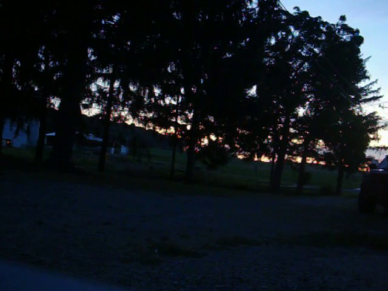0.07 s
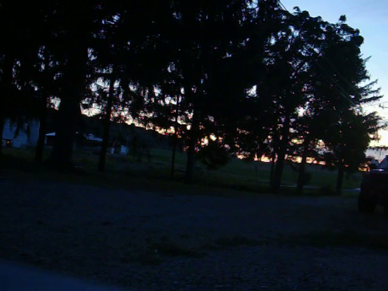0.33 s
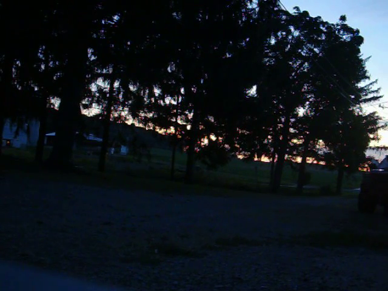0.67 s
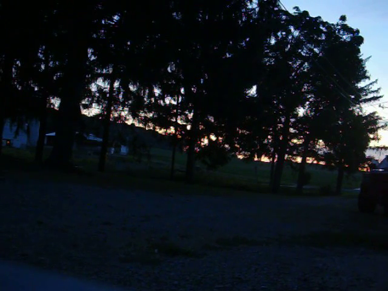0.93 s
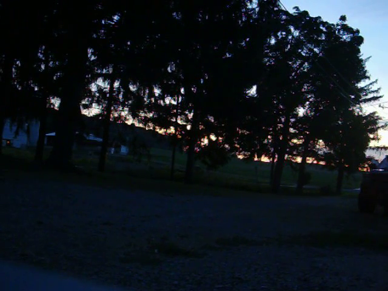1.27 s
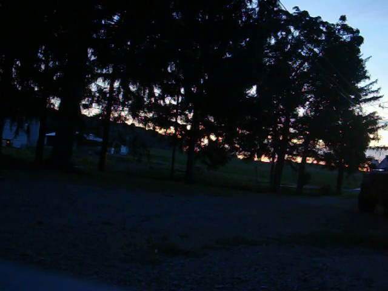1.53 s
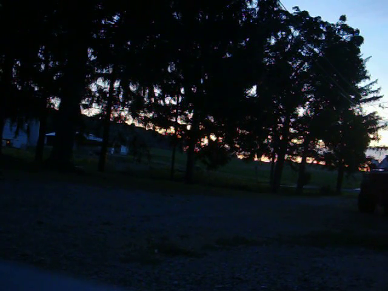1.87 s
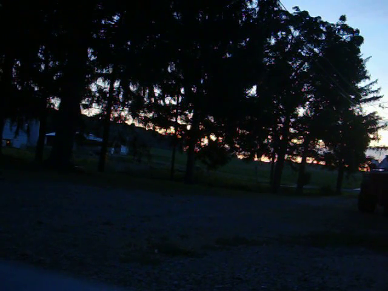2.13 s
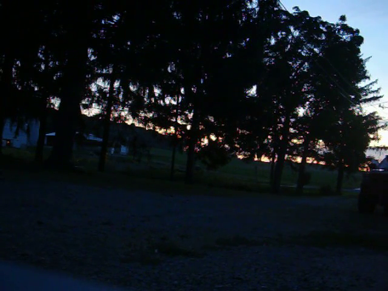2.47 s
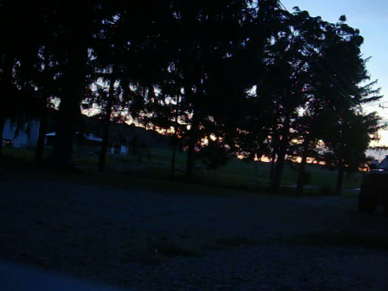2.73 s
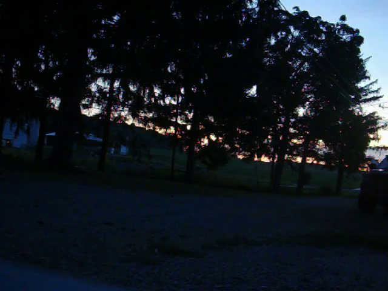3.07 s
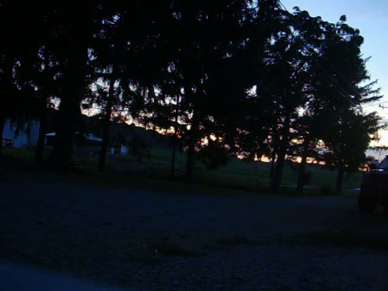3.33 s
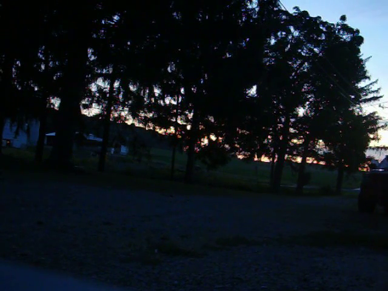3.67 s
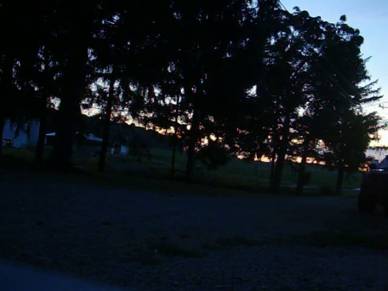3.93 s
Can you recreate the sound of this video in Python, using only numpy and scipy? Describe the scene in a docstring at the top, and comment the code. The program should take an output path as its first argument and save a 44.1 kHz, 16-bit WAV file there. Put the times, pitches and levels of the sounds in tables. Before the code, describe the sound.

Small frogs peep far off throughout the four seconds, their short rising whistles blurring into a high hiss, with one faint cricket chirping evenly. Beneath them lie soft air noise, a deep rumble, a motor's hum and a faint electrical buzz. At about 3 seconds a door rattles and bumps loudly shut, its latch clicking, then settles with a softer thud around 3.5 seconds, echoing briefly in the yard.

```python
"""A chorus of small frogs peeps far off in a yard at dusk, with one faint cricket.
Each peep is a short rising whistle; the farthest frogs blur into a hiss. Under them lie soft air
noise, a deep rumble, the hum of a motor and a faint mains buzz. Near the end something like a door
rattles and bumps shut, then settles with a softer thud. Each bump thuds, rings the door's panel
and clicks its latch, and the yard echoes."""
import sys
import numpy as np
from scipy import signal
from scipy.fft import rfft, irfft
from scipy.io import wavfile
from scipy.ndimage import uniform_filter1d

SR = 44100
rng = np.random.default_rng(int(sys.argv[2]) if len(sys.argv) > 2 else 0)


def to_wav(s):
    """Save 16-bit WAV."""
    ch = np.atleast_2d(s).T  # columns
    pcm = np.round(np.clip(ch, -1, 1) * 32767)  # PCM
    wavfile.write(sys.argv[1], SR, pcm.astype(np.int16))


N = 176400  # 4 s

# A "colour" says how strong the low and high parts of a sound are, compared with each other.
# colour of the air noise (f/Hz, level/dB)
AIR_COLOUR = [(12, 2), (30, -1), (55, -0.5), (75, -2.5), (120, -5.5), (190, -4.5), (400, -5.5), (600, -11),
              (900, -16.5), (1100, -17), (1750, -21.5), (3900, -24), (5300, -25), (6100, -31), (6900, -64)]
# colour of the deep rumble (f/Hz, level/dB)
RUMBLE_COLOUR = [(20, -34), (44, -10.5), (57, 5), (70, -13), (130, -35.5), (400, -70)]
# how the rumble rises and falls (t/s, level/dB)
RUMBLE_LEVEL = [(0, -39), (.3, -35.5), (.55, -34), (.7, -37), (1.05, -43.5), (1.5, -48), (3, -41.5),
                (4, -34)]
# tones of the motor (multiple of MOTOR_HZ, level/dB)
MOTOR_TONES = [(1, -39.5), (1.5, -46), (2, -41), (3, -47.5), (9, -51.5), (10, -56)]
# tones of the mains buzz (multiple of MAINS_HZ, level/dB)
MAINS_TONES = [(2, -45), (7, -49.5), (12, -57), (13, -54), (14, -55), (16, -51), (21, -64.5), (61, -53),
               (62, -57)]
# time the yard's echo takes to fade by 60 dB (f/Hz, t/s)
ECHO_FADE = [(100, .7), (500, 0.6), (1300, 0.67), (3000, 0.38), (6500, 0.34)]
# colour of the farthest frogs, with their octave (f/Hz, level/dB)
FAR_FROG_COLOUR = [(1700, -30.5), (2030, -9), (2180, 0.5), (2550, 3.5), (2680, -2.5), (3050, -0.5),
                   (3370, 4), (3520, -7), (3850, -23.5), (4450, -14), (4750, -11.5), (5030, -15),
                   (5400, -16), (6500, -47.5)]
# nearer frog groups (pitch f/Hz, spread f/Hz, level/dB, peeps per second, peep length t/s)
FROG_GROUPS = [(2204, 41, -48, 30, .11), (2502, 46, -51, 31, 0.1), (2772, 90, -50, 46, .1),
               (3304, 14.6, -45.5, 13, 0.036), (3267, 54, -47.5, 40, .1)]
# how one more frog group swells and fades (t/s, level/dB)
SWELL_LEVEL = [(0, -39), (.7, -55.5), (1.4, -49), (1.95, -46), (2.25, -38.5), (2.9, -39.5), (3.25, -45),
               (3.6, -56.5), (4, -41)]
# strength of the overtone an octave above a peep (peep pitch f/Hz, level/dB)
PEEP_OCTAVE = [(2200, -10.5), (2520, -18), (2900, -26), (3300, -41.5)]
# bumps of the door (start t/s, fade t/s, thud level/dB, panel level/dB, latch level/dB)
DOOR_BUMPS = [(2.986, 0.077, -31.5, -35, -35), (3.02, .02, -27.5, -28.5, -38),
              (3.025, 0.014, -20, -35, -19), (3.04, 0.074, -23, -39.5, -43.5),
              (3.07, 0.0088, -27, -30.5, -48), (3.081, 0.0092, -20.5, -15.5, -20),
              (3.101, 0.024, -18.5, -22.5, -24), (3.123, 0.0049, -13.5, -24, -43),
              (3.134, 0.0066, -20, -13.5, -18.5), (3.139, 0.029, -39.5, -20.5, -21),
              (3.181, 0.06, -27, -35.5, -29.5), (3.434, 0.015, -23, -35, -28.5),
              (3.459, 0.016, -21.5, -30, -51), (3.477, 0.018, -25, -41.5, -25.5),
              (3.539, .025, -34, -50.5, -40)]
# tones the door panel rings at (f/Hz, level/dB, time to fade by 60 dB t/s)
PANEL_TONES = [(202, -4, .14), (363, -4, 0.019), (445, -7, 0.043), (632, 4, 0.041), (818, 4.5, 0.03),
               (960, -17, 0.012), (1207, -2, 0.11), (1355, 1.5, 0.03), (1540, -0.5, .02),
               (1970, -3.5, .022), (2080, -3, .03), (2460, -5.5, .032), (2700, -4, 0.038),
               (3350, -28, 0.017)]
# colour of the door's thud (f/Hz, level/dB)
THUD_COLOUR = [(25, -17), (70, -16), (115, -0.5), (160, -4.5), (215, 2), (285, -7.5), (400, -3.5),
               (620, -5), (1000, -19.5), (3000, -51.5)]
# colour of the latch's click (f/Hz, level/dB)
LATCH_COLOUR = [(150, -7), (700, 16.5), (1400, 4.5), (2600, 5.5), (3600, 2.5), (4600, -0.5), (5800, -6.5),
                (6700, -20.5), (7600, -53)]

MOTOR_HZ, MAINS_HZ = 53.8, 60


def amp(db):
    """Turns decibels into a number to multiply by."""
    return 10 ** (np.asarray(db) / 20)


def unit(x):
    """Scales a sound to an average strength (rms) of 1."""
    return x / np.sqrt(np.mean(x ** 2) + 1e-20)


def read(points, hz):
    """Looks up a frequency in a table, blending between rows on a log scale."""
    f, value = np.transpose(points)
    return np.interp(np.log(hz + 1), np.log(f + 1), value)


def level(points):
    """Makes a volume curve from (t/s, level/dB) points."""
    return amp(np.interp(np.arange(N) / SR, *np.transpose(points)))


def add(mix, start_s, sound):
    """Adds a sound to the mix at a given time."""
    part = mix[max(round(start_s * SR), 0):][:len(sound)]
    part += sound[:len(part)]


def drift(rate_hz):
    """A smooth random wobble of strength 1; a higher rate wobbles faster."""
    smoothing = np.exp(-(np.fft.rfftfreq(N, 1 / SR) / rate_hz) ** 2)
    return unit(irfft(rfft(rng.standard_normal(N)) * smoothing, N))


def wash(colour, patch_db=0.78, flicker_db=0.2):
    """Coloured noise with drifting louder patches and a slight overall flicker."""
    frames, hz = N // 512 + 6, np.fft.rfftfreq(2048, 1 / SR)
    real, imag, patches = rng.standard_normal((frames, len(hz), 3)).T
    patches = unit(uniform_filter1d(uniform_filter1d(patches, size=12, axis=0), size=6, axis=1))
    spectrum = (real + 1j * imag) * amp(read(colour, hz)[:, None] + patch_db * patches)
    noise = signal.istft(spectrum, nperseg=2048, noverlap=1536)[1][:N]
    return unit(noise * amp(flicker_db * drift(25)))


def air(hiss_db=-35.5):
    """Steady air noise over a distant rumble that rises and falls."""
    return amp(hiss_db) * wash(AIR_COLOUR) + level(RUMBLE_LEVEL) * wash(RUMBLE_COLOUR)


def hum(hz, tones, waver_db, wander_rad):
    """A motor or mains hum: multiples of one pitch, each wavering on its way through the air."""
    turns, out = hz * np.arange(N) / SR, np.zeros(N)
    for multiple, db in tones:
        waver = amp(waver_db * drift(11))
        phase = 2 * np.pi * (multiple * turns + rng.random()) + wander_rad * drift(10)
        out += amp(db) * unit(waver * np.sin(phase))
    return out


def yard_echo(sound, build_s=0.018):
    """Walls and trees scatter a sound into a soft echo; the high notes die first."""
    hz, t, spectrum = signal.stft(rng.standard_normal(SR), SR, nperseg=256)
    fall_db = -60 * t / read(ECHO_FADE, hz)[:, None]
    tail = signal.istft(spectrum * amp(fall_db), SR, nperseg=256)[1]
    tail *= np.minimum(np.arange(len(tail)) / SR / build_s, 1) ** 2
    return signal.fftconvolve(sound, tail / np.linalg.norm(tail))[:N]


def cricket(hz=5020, blur_hz=87, db=-57.5, first_s=0.03, every_s=0.448):
    """One distant cricket chirps evenly; the trees blur each chirp into a fuzzy whistle."""
    t = np.arange(N) / SR
    phase = 2 * np.pi * hz * t
    whistle = drift(blur_hz) * np.cos(phase) + drift(blur_hz) * np.sin(phase)
    pulses = np.cos(np.pi * (t - first_s) / every_s) ** 2
    return amp(db) * unit(whistle * pulses)


def peeps(hz, spread_hz, per_s, length_s, glide=0.024):
    """One group of frogs calls in short, nearly pure whistles that slide upward."""
    out = np.zeros(N + SR)  # half a second to spare at each end
    progress = np.arange(0, length_s, 1 / SR) / length_s
    calls = rng.random((500, 4))[:int(per_s * len(out) / SR)]
    for k, (late, up, down, softness) in enumerate(calls):
        pitch = (hz + 2 * spread_hz * (up - down)) * (1 + glide * (progress - .5))
        phase = 2 * np.pi * np.cumsum(pitch) / SR
        whistle = np.sin(phase) + amp(read(PEEP_OCTAVE, hz)) * np.sin(2 * phase)
        add(out, (k + late) / per_s, amp(-9 * softness) * np.sin(np.pi * progress) * whistle)
    return unit(out[SR // 2:][:N])


def frogs(echo_db=-6, far_db=-37):
    """The nearer frogs peep and echo among the trees; the farthest merge into one hiss."""
    near = sum(amp(db) * peeps(hz, spread, per_s, length)
               for hz, spread, db, per_s, length in FROG_GROUPS)
    near += level(SWELL_LEVEL) * peeps(hz=2974, spread_hz=70, per_s=100, length_s=0.08)
    echo = amp(echo_db)
    near = (near + echo * yard_echo(near)) / np.hypot(1, echo)  # about as loud as without echo
    return near + amp(far_db) * wash(FAR_FROG_COLOUR)


def tap(colour):
    """The short sound of one sharp tap with this colour, scaled to energy 1."""
    log_gain = np.log(amp(read(colour, abs(np.fft.fftfreq(4096, 1 / SR)))))
    spectrum = np.exp(np.conj(signal.hilbert(log_gain)))  # packs the energy at the start
    sound = np.fft.ifft(spectrum).real[:2048]
    return sound / np.linalg.norm(sound)


def door(attack_s=0.0023, contacts_per_s=5000, firm_contact=0.59, echo_db=-10):
    """Each bump is a firm contact and a dying chatter; it thuds, rings the panel and clicks the latch."""
    t = np.arange(SR // 3) / SR
    ring = sum(amp(db - 60 * t / fade_s) * np.sin(2 * np.pi * hz * t) for hz, db, fade_s in PANEL_TONES)
    parts = [tap(THUD_COLOUR), ring / np.linalg.norm(ring), tap(LATCH_COLOUR)]
    pushes = np.zeros((3, N))  # the force on each part
    for start_s, fade_s, *levels_db in DOOR_BUMPS:
        chatter = unit(rng.choice([-1, 1], len(t)) * (rng.random(len(t)) < contacts_per_s / SR))
        chatter *= np.minimum(t / attack_s, 1) * np.exp(-np.maximum(t - 2 * attack_s, 0) / fade_s)
        chatter[round(attack_s * SR)] += firm_contact
        for push, db in zip(pushes, levels_db):
            add(push, start_s, amp(db) * chatter)
    direct = sum(signal.fftconvolve(push, part)[:N] for push, part in zip(pushes, parts))
    return direct + amp(echo_db) * yard_echo(direct)


def scene():
    """Mixes air, motor, mains, door, frogs and cricket into one channel."""
    background = air()
    motor = hum(MOTOR_HZ, MOTOR_TONES, waver_db=2.0, wander_rad=0.55)
    mains = hum(MAINS_HZ, MAINS_TONES, waver_db=-1.33, wander_rad=0.42)
    return (background + motor + mains + door() + frogs() + cricket())[None]


def record(dry):
    """Cuts away the highest treble, above 6900 Hz."""
    low_pass = signal.firwin(401, 6900, window=("kaiser", 9), fs=SR)
    return signal.oaconvolve(dry, low_pass[None], "same")


dry = scene()
out = record(dry)
to_wav(out)
```